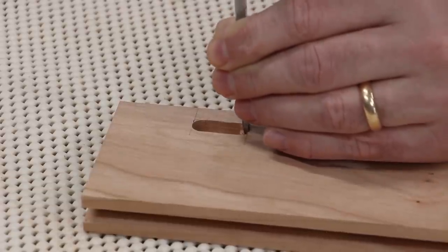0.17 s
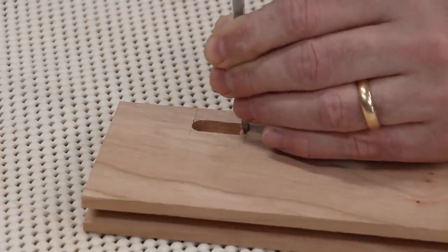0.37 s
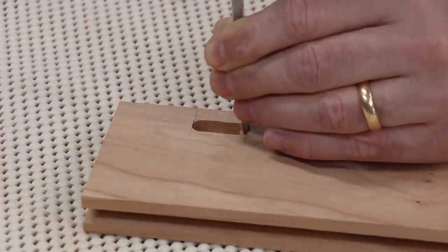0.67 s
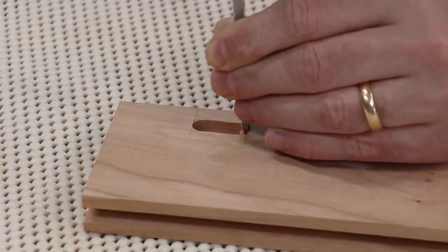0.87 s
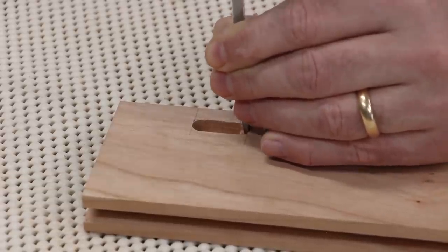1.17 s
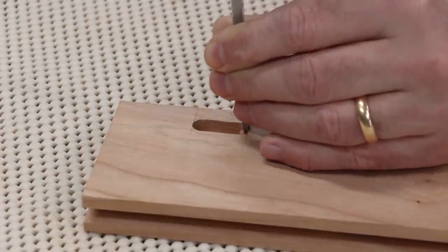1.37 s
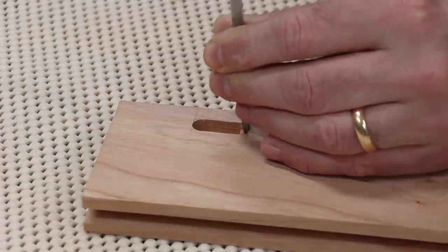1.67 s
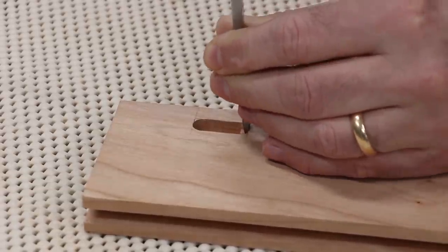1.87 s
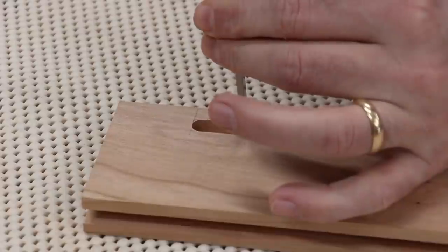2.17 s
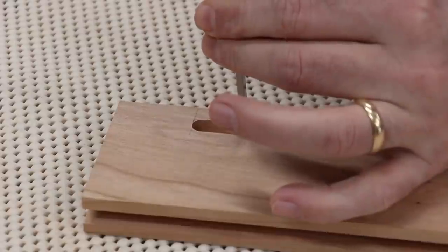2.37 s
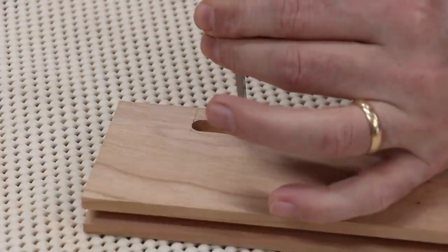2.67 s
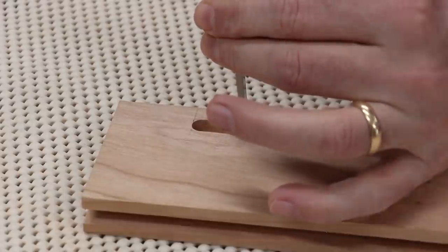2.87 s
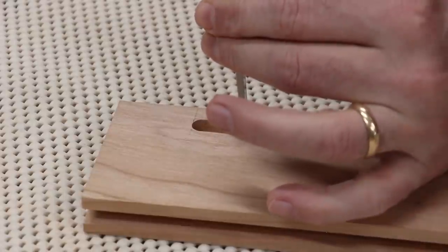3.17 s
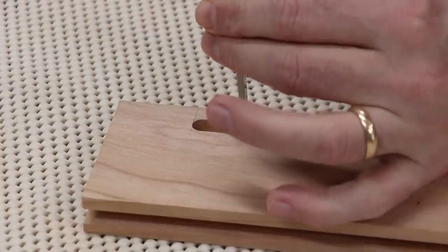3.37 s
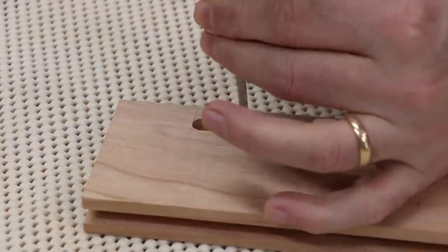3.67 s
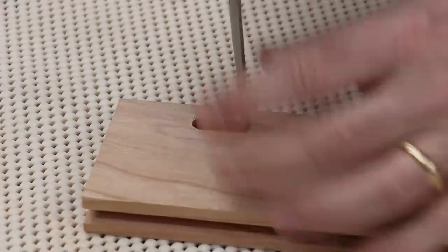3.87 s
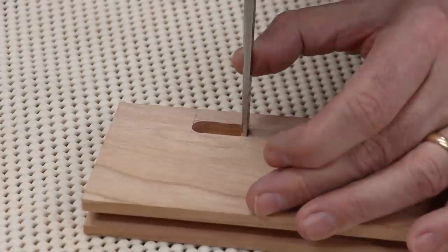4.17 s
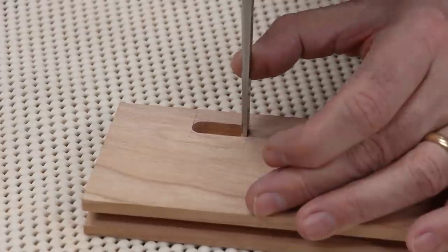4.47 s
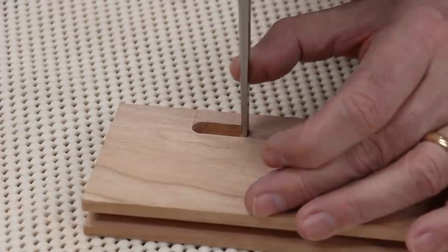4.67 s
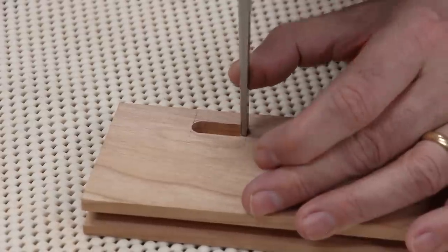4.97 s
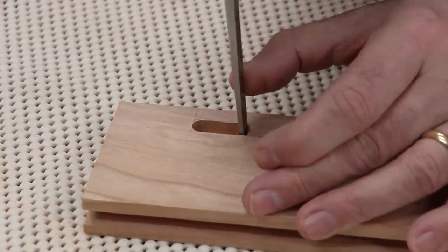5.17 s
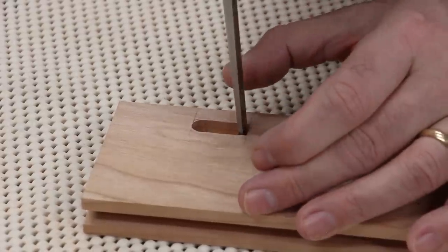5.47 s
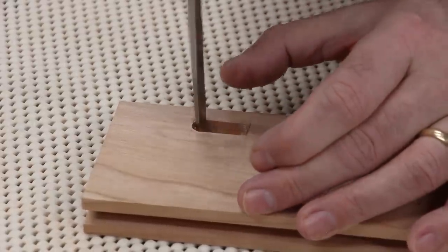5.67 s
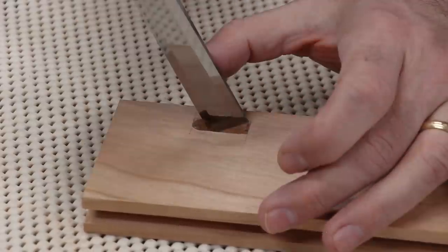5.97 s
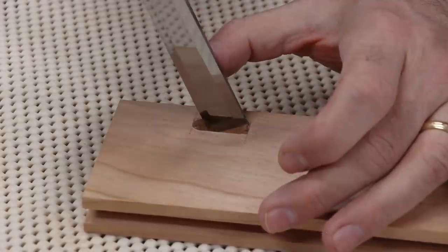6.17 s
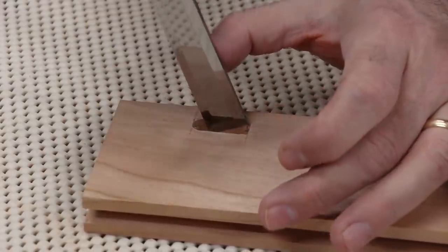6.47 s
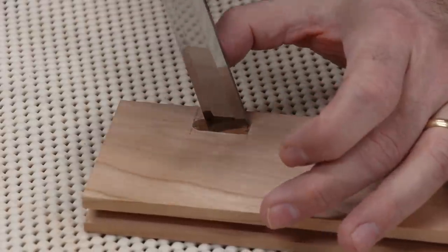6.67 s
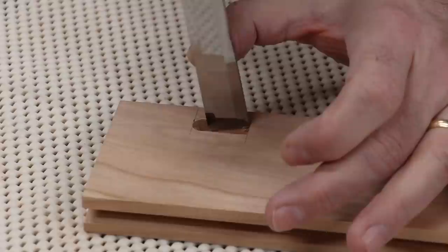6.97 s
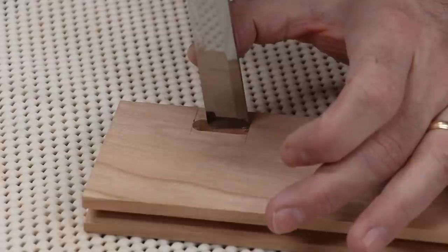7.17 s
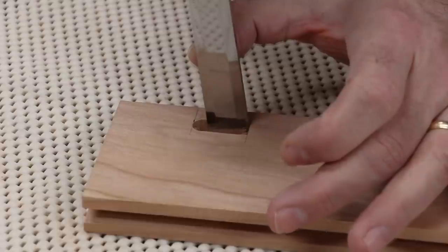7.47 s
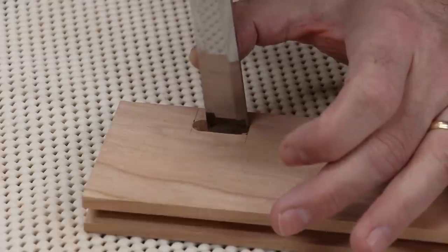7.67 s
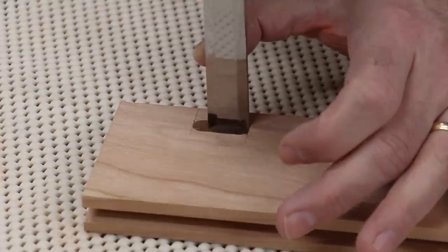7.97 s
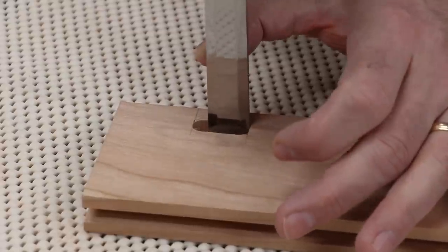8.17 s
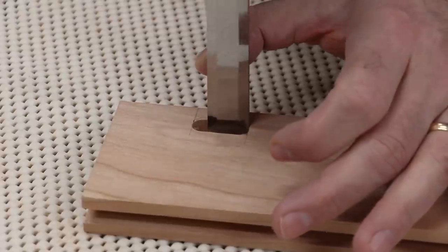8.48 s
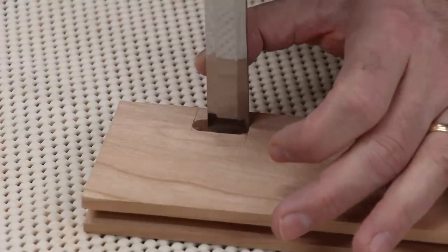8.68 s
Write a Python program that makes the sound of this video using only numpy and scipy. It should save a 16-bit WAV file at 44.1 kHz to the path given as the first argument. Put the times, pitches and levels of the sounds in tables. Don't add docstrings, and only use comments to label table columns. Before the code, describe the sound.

A close microphone in a hard, echoing workshop with low fan rumble, soft hiss and a barely audible high electric whine. The echo of an earlier blow is already fading at the start. Mallet blows on a chisel crack at 0.1, 0.6, 0.8 and 1.0 s, woody and steely with a bench thump, their peaks flattened. Skin rubs hiss over a mat from 1.4 to 2.05 s. A gentler tap falls at 2.3 and a bright last blow at 2.6, its echo dying away. A low thud comes at 3.2, a dull rub at 3.85, then small bites and scrapes from 4.2, peaking in a solid wooden knock at 4.8. The blade bites and drags at 5.65. At 5.9 a cut stops the echo and the air drops slightly. Faint steely scratches follow, a firmer scrape and knock at 7.6, and crisp ticks around 8.5.

```python
import sys
import numpy as np
from scipy import signal
from scipy.fft import rfft, irfft
from scipy.io import wavfile
from scipy.ndimage import uniform_filter1d

SR = 44100
rng = np.random.default_rng(int(sys.argv[2]) if len(sys.argv) > 2 else 0)


def wav_record(signal):
    frames = np.transpose(np.atleast_2d(signal))
    bounded = np.clip(frames, -1, 1)
    quanta = np.round(bounded * 32767).astype(np.int16)
    wavfile.write(sys.argv[1], SR, quanta)


def magnitude_from_level(level_db):
    exponent = np.asarray(level_db, float) / 20
    return 10 ** exponent


N = 388962
LEAD = SR // 4
TOTAL = N + LEAD


def colour(points, size=2048):
    hz, db = np.transpose(points)
    f = np.maximum(np.arange(size // 2 + 1) * SR / size, 1)
    level_db = np.interp(np.log(f), np.log(hz), db)
    cepstrum = irfft(np.log(magnitude_from_level(level_db)))
    cepstrum[1:size // 2] *= 2
    cepstrum[size // 2 + 1:] = 0
    h = irfft(np.exp(rfft(cepstrum)))
    return h / np.sqrt(np.sum(h ** 2))


def through(x, h):
    return signal.fftconvolve(x, h)[:len(x)]


def add(track, s, sound):
    i = LEAD + int(s * SR)
    track[i:i + len(sound)] += sound[:len(track) - i]


def ring(modes, scatter_db=1.5, size=SR // 2):
    hz, db, t60 = np.transpose(modes)[:, :, None]
    t = np.arange(size) / SR
    chance = rng.standard_normal((2, len(hz), 1))
    tone = np.sin(2 * np.pi * hz * (1 + .006 * chance[0]) * t)
    decay = np.exp(-np.log(1000) * t / t60)
    sign = (-1.) ** np.arange(len(hz))[:, None]
    return np.sum(sign * magnitude_from_level(db + scatter_db * chance[1]) * tone * decay, axis=0)


def walk(rate):
    k = int(SR / rate)
    x = np.repeat(rng.standard_normal(TOTAL // k + 1), k)
    x = uniform_filter1d(uniform_filter1d(x, k), k)[:TOTAL]
    return x / np.std(x)


def grit(rate, spread_db):
    happens = rng.random(TOTAL) < rate / SR
    x = happens * rng.standard_normal(TOTAL) * magnitude_from_level(spread_db * rng.exponential(size=TOTAL))
    return x / np.std(x)


# (frequency [Hz], level [dB per Hz])
AIR_COLOUR = [(15, -20), (28, -9), (55, -4), (90, 1), (130, -3), (170, -8), (222, -7), (300, -14),
              (500, -21), (1000, -25), (2400, -30), (3500, -28), (5000, -33.5), (11000, -35.5),
              (12600, -37.5), (16000, -39)]


def air():
    t = np.arange(TOTAL) / SR
    rumble = through(rng.standard_normal(TOTAL), colour(AIR_COLOUR, size=8192))
    rumble = rumble * magnitude_from_level(-69 + .8 * walk(1.5))
    whine_hz, whine_db = 10830, -97
    whine_level = magnitude_from_level(whine_db + 1.5 * walk(4)) * np.sqrt(2)
    whine = whine_level * np.sin(2 * np.pi * whine_hz * t + .6 * walk(60))
    return rumble + whine


# (frequency [Hz], decay by 60 dB [s])
ROOM_DECAY = [(60, 1), (200, 0.8), (600, .62), (1500, 0.54), (3900, 0.52), (6000, 0.38), (9000, 0.17),
              (15000, 0.13)]
# (frequency [Hz], level [dB])
ROOM_TONE = [(40, -28.5), (110, -16.5), (250, -3.5), (500, -2), (1200, 1), (2500, 1), (3600, -3.5),
             (6000, -4.5), (16000, -15.5)]
# (frequency [Hz], level [dB], decay by 60 dB [s])
STANDING_WAVES = [(35, -12, .5), (52, -16, .6), (78, -8, .6), (137, -4, .5), (158, -2, .55), (182, -2, .6),
                  (197, -3, .75), (214, -3, .7), (300, -6, .6), (321, -7, .7), (374, -6, .75),
                  (464, -10, .6)]


def workshop():
    echo_db, waves_db = -11.5, -20.5
    gap_s, build_s = 0.0034, 0.0035
    t, tail = np.arange(SR) / SR, 0
    hz, t60 = np.transpose(ROOM_DECAY)
    f = np.arange(SR // 2 + 1) + 1.
    noise = rfft(rng.standard_normal(SR))
    for centre in 40 * 2 ** np.arange(0, 9, .5):
        window = np.cos(np.pi * np.clip(np.log2(f / centre), -.5, .5)) ** 2
        band_t60 = np.interp(np.log(centre), np.log(hz), t60)
        tail = tail + irfft(noise * window) * np.exp(-np.log(1000) * t / band_t60)
    tail = through(tail, colour(ROOM_TONE)) + magnitude_from_level(waves_db) * ring(STANDING_WAVES, size=SR)
    tail = tail * (1 - np.exp(-np.maximum(t - gap_s, 0) / build_s))
    tail = magnitude_from_level(echo_db) * tail / np.sqrt(np.sum(tail ** 2))
    tail[0] = 1
    return tail


# (time [s], length [s], dull level [dB], bright level [dB])
SLIDES = [
    (1.421, .12, -72, -82),
    (1.519, .53, -63, -75),
    (1.885, .022, -77, -63),
    (1.945, .108, -84, -70),
    (3.843, .235, -70, -75),
]
# (frequency [Hz], level [dB per Hz])
SKIN_COLOUR = [(240, -31), (400, -2.5), (712, -8.5), (1090, -2), (1220, -5.5), (2950, -8), (3730, -6.5),
               (5130, -18.5), (7500, -16.5), (9750, -43), (16500, -120)]
# (frequency [Hz], level [dB per Hz])
RIB_COLOUR = [(3240, -35), (5500, -5), (6540, -2), (8410, -1), (9750, -1), (11600, -4), (15500, -11)]


def fingers():
    grip_s, lift_s = 0.0092, .012
    dull_sag, bright_sag = -24, -3
    dull, bright = np.zeros((2, TOTAL))
    rub = grit(9000, 1.5) * magnitude_from_level(1.0 * walk(40) + 1.8 * walk(12))
    for s, length, dull_db, bright_db in SLIDES:
        u = np.arange(int(length * SR)) / SR
        touch = np.clip(np.minimum(u / grip_s, (length - u) / lift_s), 0, 1)
        add(dull, s, touch * magnitude_from_level(dull_db + dull_sag * u))
        add(bright, s, touch * magnitude_from_level(bright_db + bright_sag * u))
    return through(rub * dull, colour(SKIN_COLOUR)) + through(rub * bright, colour(RIB_COLOUR))


# (time [s], level [dB], frequency [Hz], decay by 60 dB [s])
KNOCKS = [(1.532, -56, 1138, 0.076), (1.547, -59.5, 1290, 0.049), (1.882, -49, 95, 0.2),
          (1.92, -56, 60, 0.28), (3.226, -37, 108, 0.11), (3.27, -50, 260, 0.051),
          (3.261, -37, 102.9, 0.19), (3.233, -45, 52.36, 0.45), (3.244, -56, 1544, .04),
          (4.798, -28, 190, .03), (4.8, -31.5, 380, .025), (4.801, -33, 673, .02),
          (4.8446, -14.5, 176, 0.024), (4.8455, -18.5, 464, 0.016), (4.845, -25, 300, 0.02),
          (4.846, -23.5, 640, 0.021), (4.8465, -30, 900, 0.023), (4.83, -36, 53.3, 0.48),
          (5.66, -38, 150, 0.051), (5.665, -38, 214, 0.074), (5.662, -36.5, 290, .05),
          (5.845, -48.5, 1150, 0.063), (5.848, -60, 2200, 0.033), (7.58, -37.5, 208.4, 0.041),
          (7.583, -31, 300, .07), (7.6, -48, 47, 0.4)]


def knocks():
    out, t = np.zeros(TOTAL), np.arange(SR) / SR
    for s, db, hz, t60 in KNOCKS:
        build = 1 - np.exp(-t * 2.84 * np.minimum(hz, 400))
        add(out, s, ring([(hz, db, t60)], scatter_db=0, size=SR) * build)
    return out


# (time [s], level of force [dB], level of fibre tear [dB], level of steel ring [dB])
TICKS = [(1.972, -58, -15.5, -11.5), (2.046, -63, -4.5, -15), (2.533, -68, 6, -.6), (3.140, -58, -22, -6),
         (4.298, -62.5, 2.5, 3.9), (4.308, -61, -5.5, -5), (4.586, -67, .1, 4.5), (5.358, -58, -25, -12.5),
         (5.790, -66.5, -1, -.6), (5.813, -65, 3, 1.2), (6.133, -71.5, -16.5, 3), (6.535, -58, -17, -1),
         (6.628, -65, -19, .1), (6.944, -64.5, -17, -3.5), (7.0225, -64.5, -13, 4), (7.164, -74, -12, 2.5),
         (7.878, -60.5, -28, -7), (7.886, -59, -19, 3.5), (7.971, -62, -6, 12), (8.027, -64, -10, -15),
         (8.458, -52, -12, -4), (8.4995, -55, -3, 2.2), (8.5252, -49.5, -4.5, 4)]
BITES = [
    (4.168, -66, -26, -15),
    (4.6335, -45, -15, -15.5),
    (4.783, -52, -11, -7),
    (5.652, -43, 1, 6),
    (5.672, -39.5, -7.5, 7),
    (7.568, -52, -3, 7.5),
]
SCRAPES = [(1.8792, -75, 7.5, 12), (3.222, -66, 19, -1), (4.2154, -45.5, -14, -.6), (4.5714, -67, -9, -6),
           (4.6327, -47.5, -16.5, -3), (4.7144, -58.5, -13, -7), (4.7925, -36.5, -9, 0.3),
           (4.8285, -38, -7, 2), (5.8424, -61.5, -11, -11), (6.5315, -66.5, -8, 8), (6.7137, -79, -9, -4.5),
           (6.9144, -71.5, -17.5, 4), (7.5729, -41, -11, -4), (7.8624, -66, -8, -6)]
DRAGS = [
    (3.26, -63, 19, 3),
    (5.628, -44, -14, 6),
    (6.066, -72, -14, 10),
    (6.1, -73, -14, 11),
    (6.64, -64, -20, 5),
    (7.562, -49, -10, 4),
    (7.9455, -63.5, -12, -12),
    (8.4744, -71.5, -6.5, 11),
]
# (frequency [Hz], level [dB])
WOOD_COLOUR = [(500, -16), (900, -2.5), (1150, 0.5), (1500, -1.5), (2000, .5), (2600, -5), (4500, -6),
               (6500, -12), (9000, -25.5)]
# (frequency [Hz], level [dB per Hz])
THUD_COLOUR = [(53, -36.5), (90, -5.5), (172, 0), (330, -1.5), (442, -5), (557, -10), (694, -11),
               (940, -27), (1100, -19), (1430, -49), (2420, -120)]
# (frequency [Hz], level [dB per Hz])
FIBRE_COLOUR = [(3240, -21.5), (5500, -5), (7620, -2.5), (8330, -5), (8990, -8.5), (12700, -13),
                (16000, -21)]
# (frequency [Hz], level [dB], decay by 60 dB [s])
EDGE_MODES = [(3180, -5, 0.006), (3290, -1.5, 0.0085), (3660, 0.4, 0.011), (3950, -2, 0.0068),
              (4300, -6, .005), (5330, -14, 0.0057), (5970, -20, 0.01), (7500, -17, 0.007)]


def chisel_edge():
    swell = np.zeros((4, TOTAL))
    # length [s], rise and fall powers, peak [dB], share of the bench [dB]
    touches = [(TICKS, 0.0184, 0.2, 3.0, -6, -9),
               (BITES, 0.005, 0.5, 3.0, -5.5, 6),
               (SCRAPES, 0.0416, 1.67, 2, -4.5, 5.5),
               (DRAGS, 0.0272, 1.67, 1.5, -7, 4.5)]
    for table, length, rise, fall, peak_db, bench_db in touches:
        u = np.arange(int(length * SR)) / (length * SR)
        shape = u ** rise * (1 - u) ** fall
        shape = shape / shape.max()
        for s, db, tear_db, steel_db in table:
            for track, share_db in zip(swell, (0, bench_db, tear_db, steel_db)):
                add(track, s, magnitude_from_level(db + share_db + peak_db) * shape)
    slips = grit(14000, 1.2)
    steel = ring(EDGE_MODES)
    steel = steel / np.sqrt(np.sum(steel ** 2))
    bodies = colour(WOOD_COLOUR), colour(THUD_COLOUR), colour(FIBRE_COLOUR), steel
    return sum(through(env * slips, body) for env, body in zip(swell, bodies))


# (time [s], level of strike [dB], contact [ms], level of blade [dB], level of shank [dB])
BLOWS = [
    (-.17, 7, 0.017, -2.5, -6),
    (0.0859, 6.5, 0.03, 6, -6),
    (0.621, 7.5, 0.067, -2.5, -3.5),
    (.8105, 5.5, 0.043, -5, -4),
    (.9880, 6.5, 0.081, -6, 2),
    (2.331, 1.5, 0.047, -16, 5),
    (2.5800, 6.5, 0.031, 6, -4),
]
# (frequency [Hz], level [dB], decay by 60 dB [s])
BENCH_MODES = [(80.3, -12, 0.05), (138, 3.5, 0.055), (176, -.7, .05), (210, -.5, 0.05), (255, -8, .04),
               (300, -1.5, 0.06), (335, -5, .05), (376, -4, .06), (440, -7, .035), (490, -9, 0.04),
               (554, -7.5, 0.04), (610, -9, .03)]
TRESTLE_MODES = [(30, 0, .12), (42, 0, .15)]
BOARD_MODES = [(660, -7, .025), (720, -5.5, .018), (784, -6, .018), (890, -5, .022), (1030, -6, 0.0067),
               (1150, -2.5, 0.015), (1189, -.8, 0.04), (1386, -4.5, 0.018), (1500, -7.5, .014),
               (1760, -5, .012), (1966, -8, .02), (2024, -8.5, 0.036), (2200, -4.5, .013),
               (2380, -7, 0.018)]
BLADE_MODES = [(2612.7, -10.5, .015), (3010, -4.5, .025), (3170, -7.5, .015), (3320, -10, .025),
               (3490, -13, .02), (3830, -5, .02), (4370, -12, .012), (5300, -20.5, 0.012)]
SHANK_MODES = [(1900, -3, .05), (1965, -1.5, .06), (2030, -1.5, .06)]
# (frequency [Hz], level [dB])
CRACK_COLOUR = [(40, -29), (110, -18.5), (170, -1), (700, -4), (1600, -1.5), (2500, -10.5), (3600, -3.5),
                (5500, -15), (9000, -18.5), (16000, -30.5)]


def mallet():
    out, t = np.zeros(TOTAL), np.arange(SR // 2) / SR
    for s, db, contact_ms, blade_db, shank_db in BLOWS:
        push = t[:400] * np.exp(-t[:400] * 1000 / contact_ms)
        burst = rng.standard_normal(len(t)) * np.exp(-t / 0.005)
        crack = magnitude_from_level(-4) * through(burst, colour(CRACK_COLOUR))
        bench = magnitude_from_level(-11) * ring(BENCH_MODES) + magnitude_from_level(-31) * ring(TRESTLE_MODES)
        bench = bench * (1 - np.exp(-t / .004))
        steel = magnitude_from_level(blade_db - 9.5) * ring(BLADE_MODES) + magnitude_from_level(shank_db - 18) * ring(SHANK_MODES)
        board = magnitude_from_level(-11.5) * ring(BOARD_MODES, scatter_db=1.66)
        body = board + steel + bench + crack
        add(out, s, magnitude_from_level(db) * through(body, push / push.sum()))
    return out


def scene():
    change_s, first_air_db = 5.889, 1.5
    sources = mallet() + chisel_edge() + knocks() + fingers()
    room = workshop()
    first = np.arange(TOTAL) < LEAD + change_s * SR
    wet = first * through(first * sources, room) + through(~first * sources, room)
    return (wet + magnitude_from_level(first_air_db * first) * air())[None, LEAD:]


def top_cut(x):
    return signal.sosfilt(signal.butter(12, 16760, fs=SR, output="sos"), x)


def record(dry):
    limit = .325
    flat = limit * dry / (limit ** 12 + dry ** 12) ** (1 / 12)
    return top_cut(flat)


dry = scene()
out = record(dry)
wav_record(out)
```